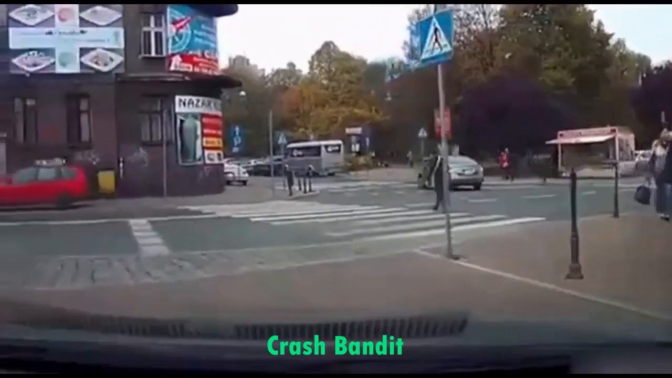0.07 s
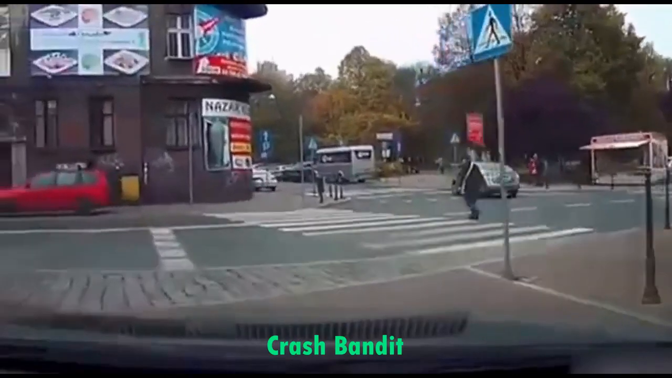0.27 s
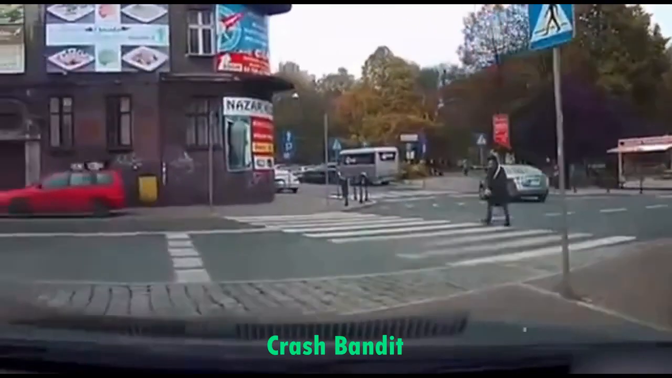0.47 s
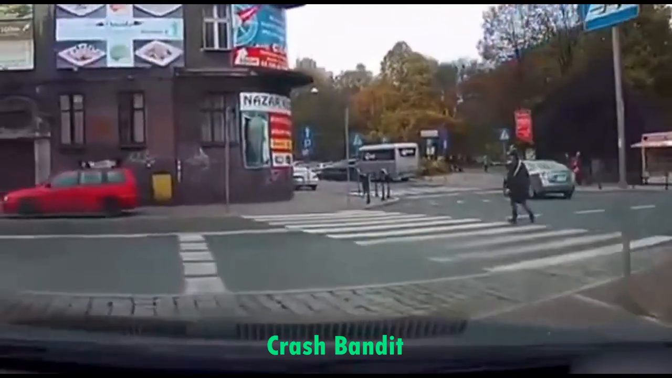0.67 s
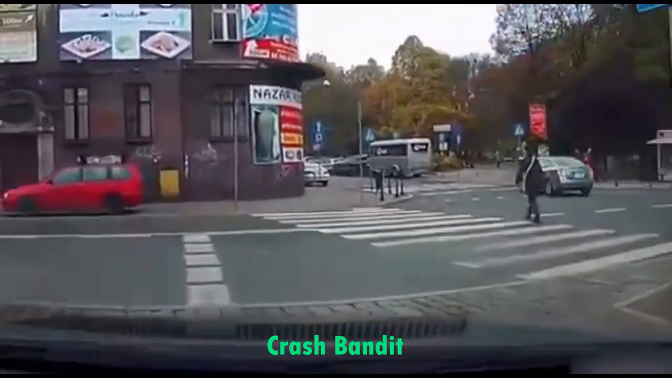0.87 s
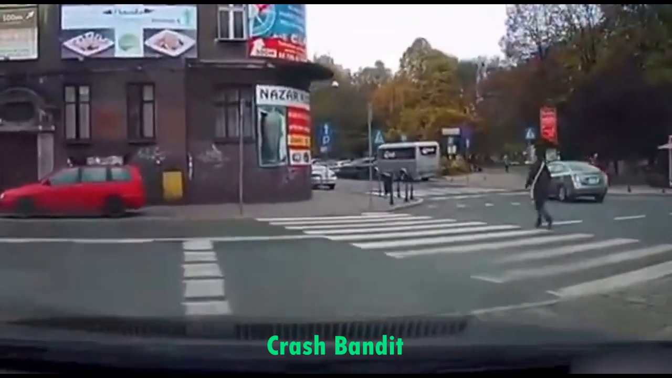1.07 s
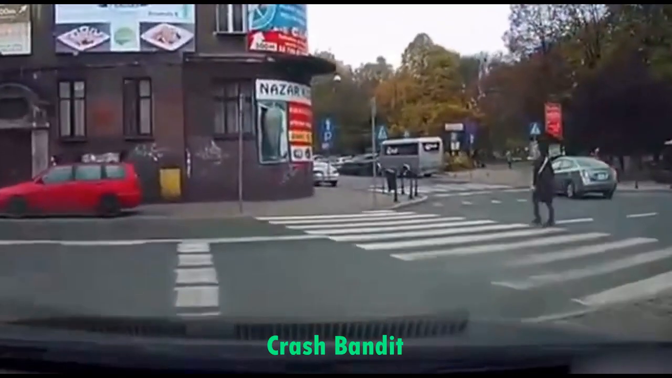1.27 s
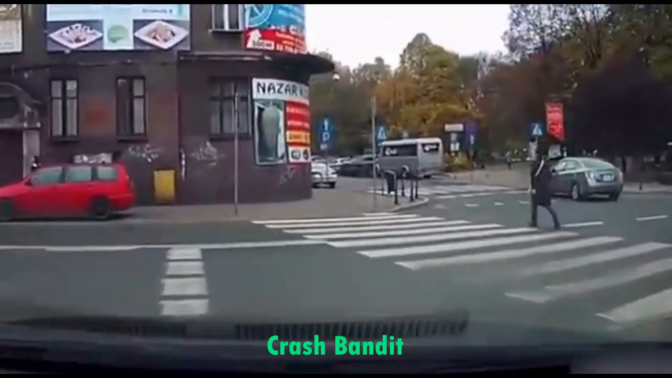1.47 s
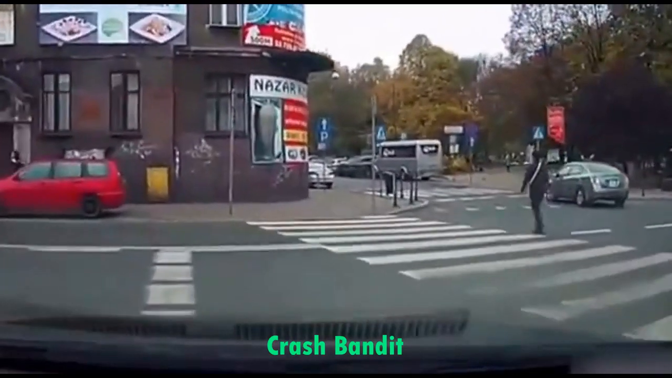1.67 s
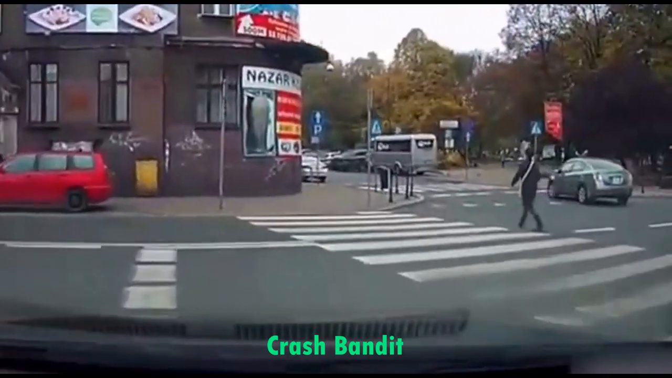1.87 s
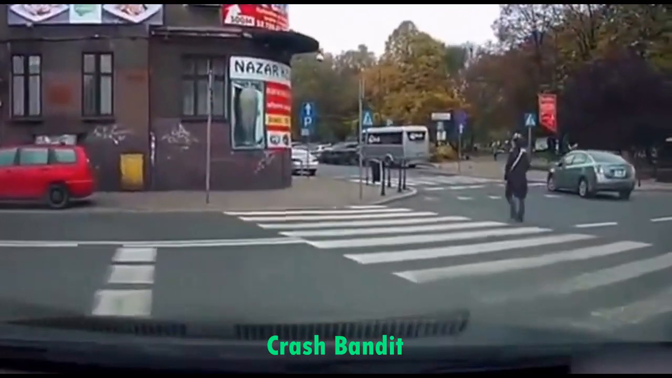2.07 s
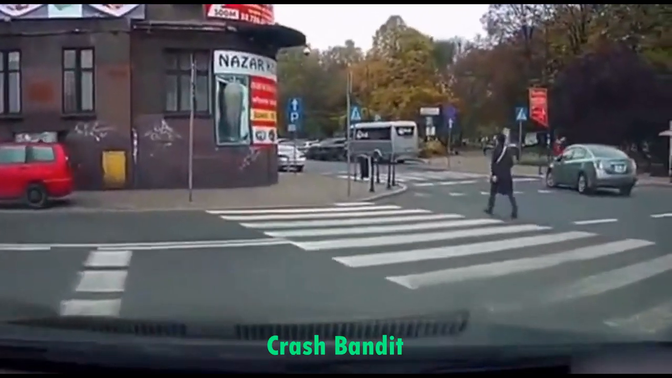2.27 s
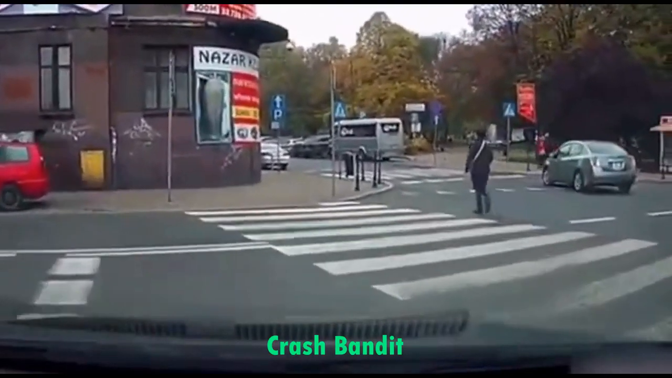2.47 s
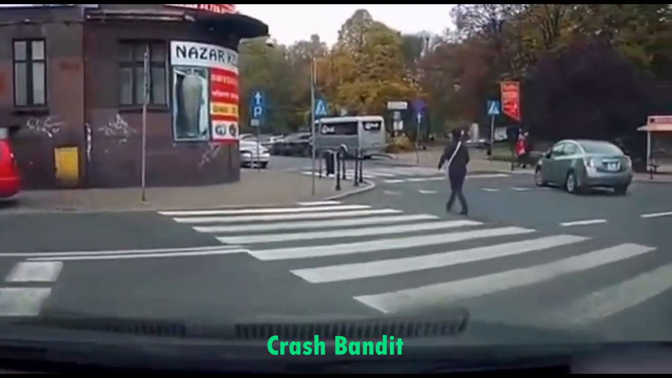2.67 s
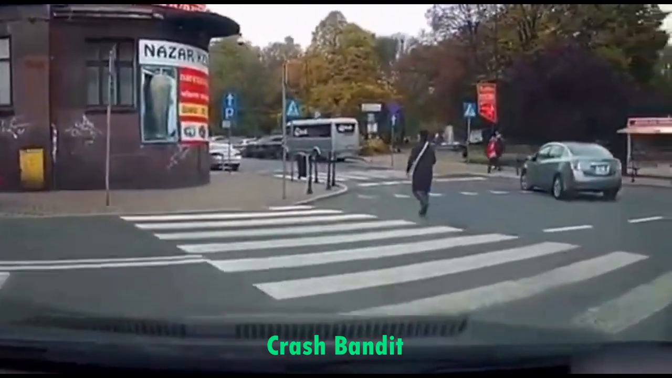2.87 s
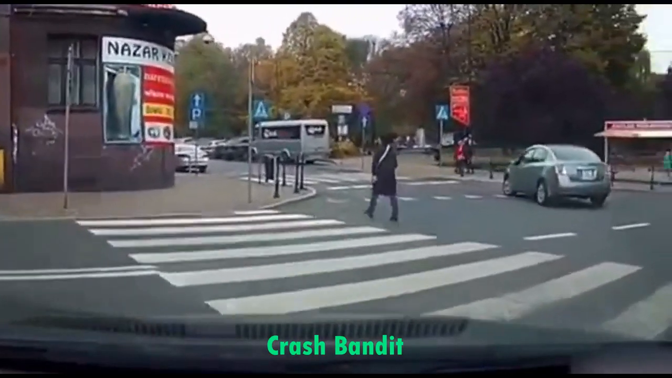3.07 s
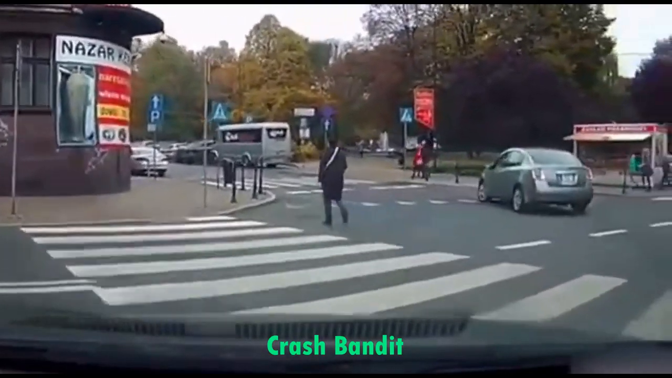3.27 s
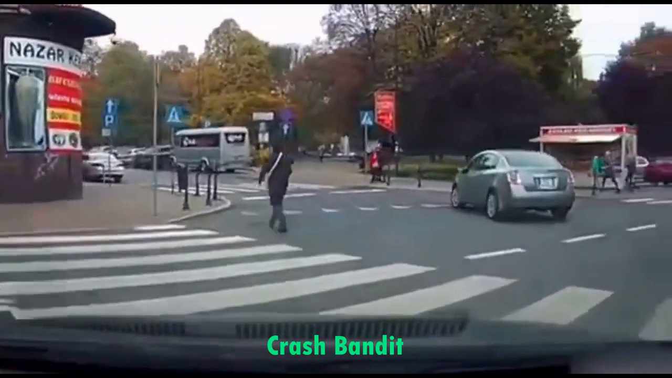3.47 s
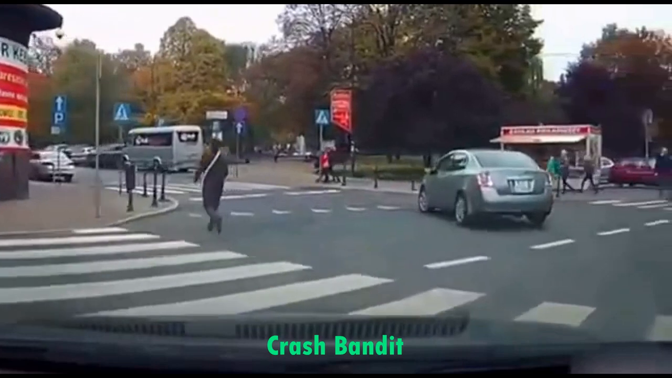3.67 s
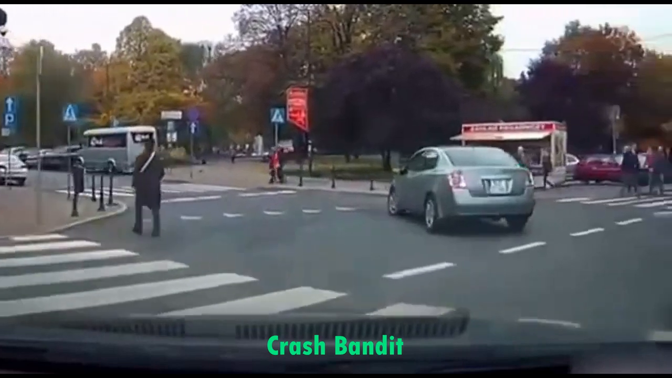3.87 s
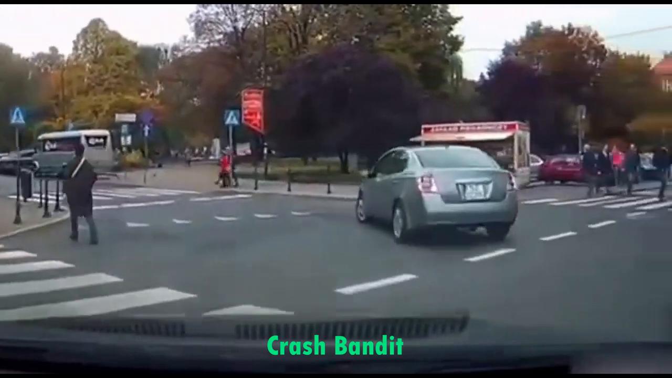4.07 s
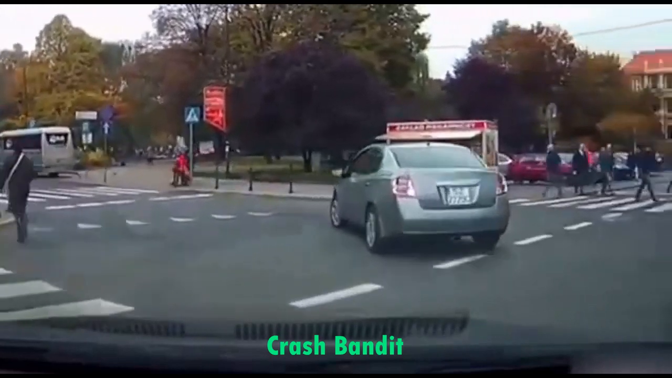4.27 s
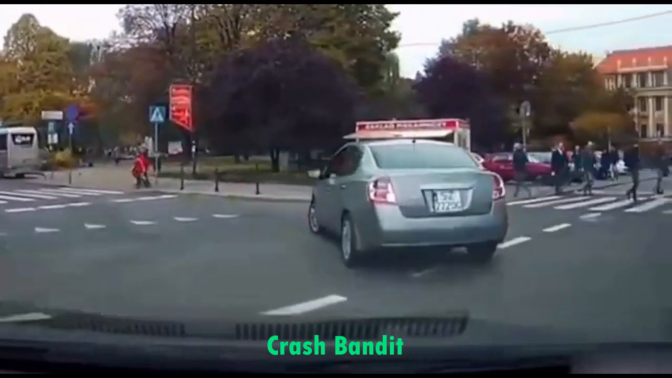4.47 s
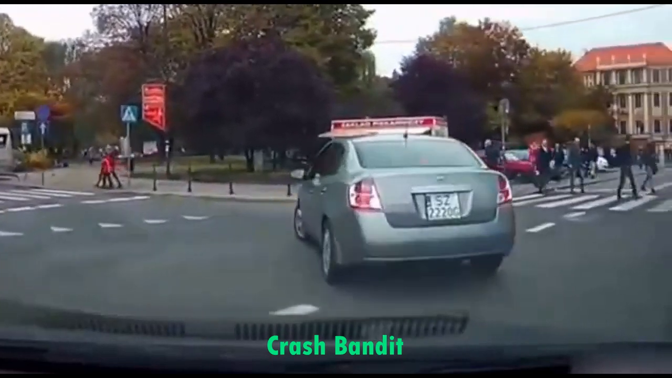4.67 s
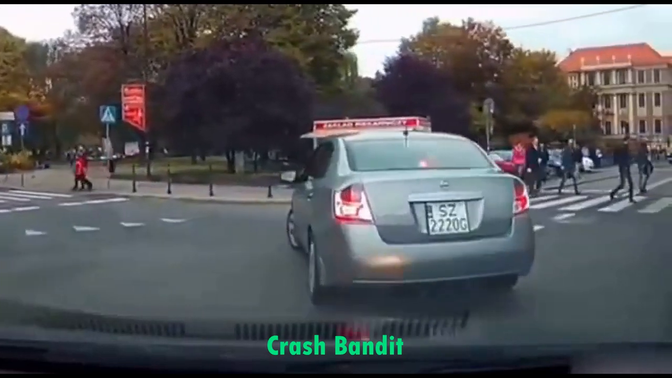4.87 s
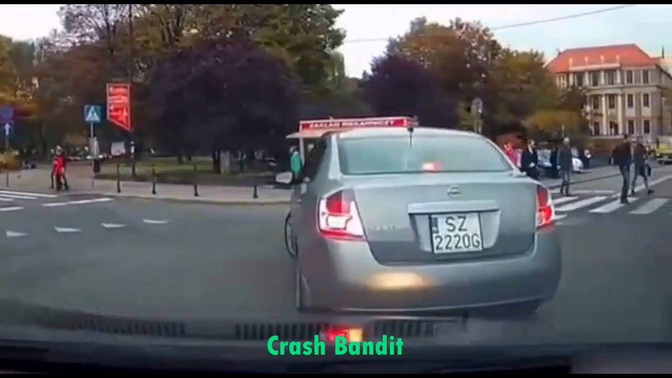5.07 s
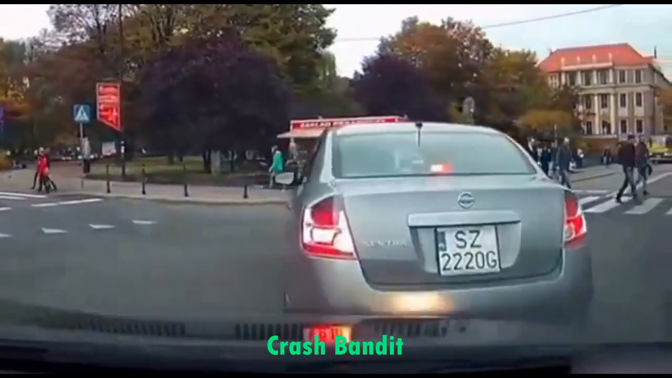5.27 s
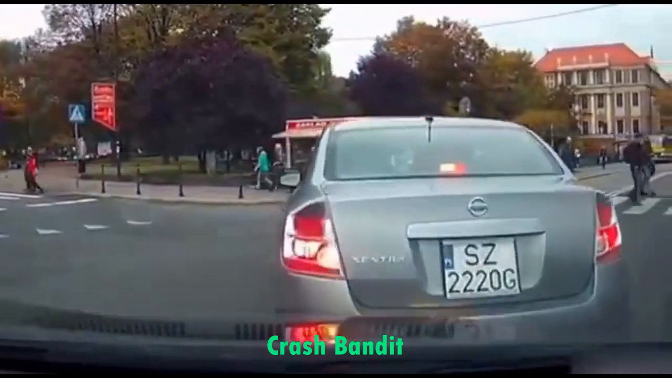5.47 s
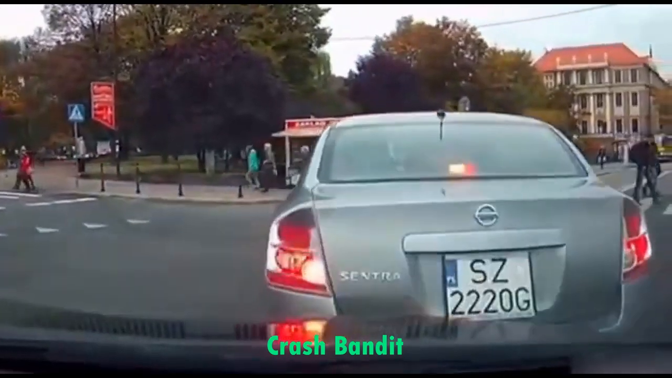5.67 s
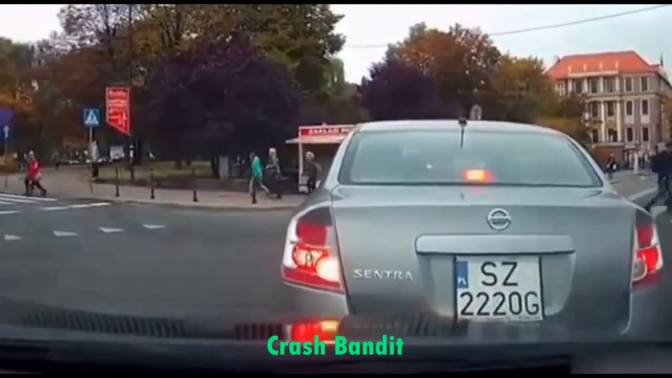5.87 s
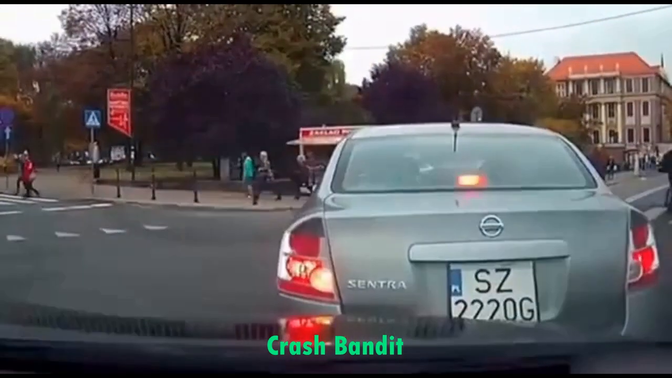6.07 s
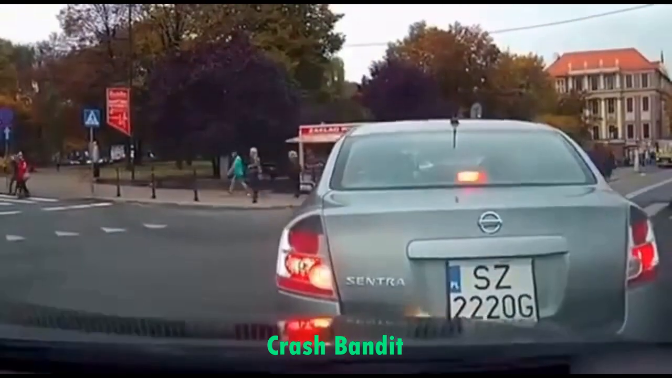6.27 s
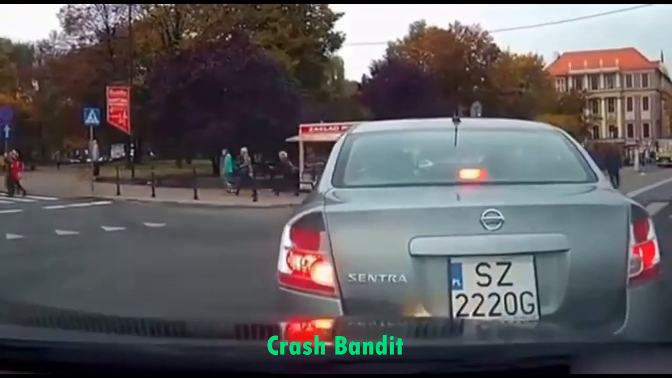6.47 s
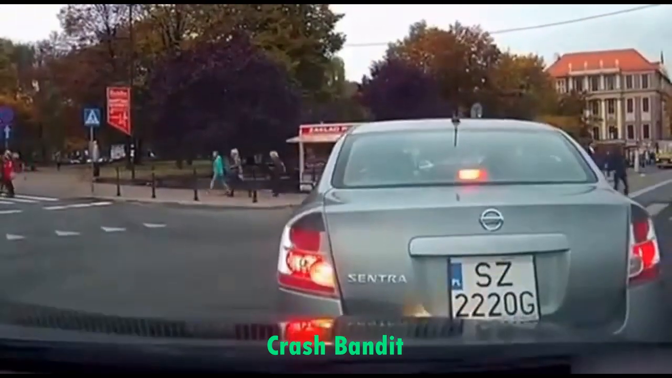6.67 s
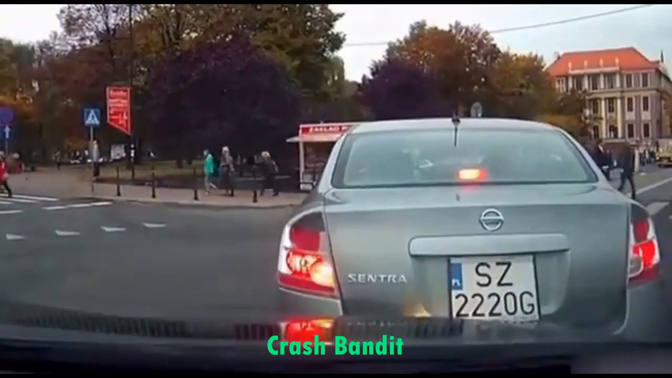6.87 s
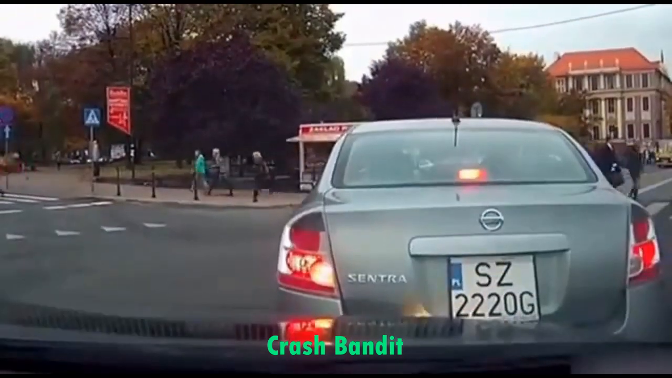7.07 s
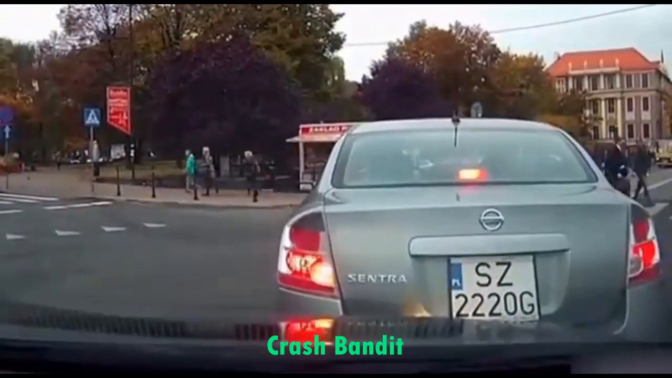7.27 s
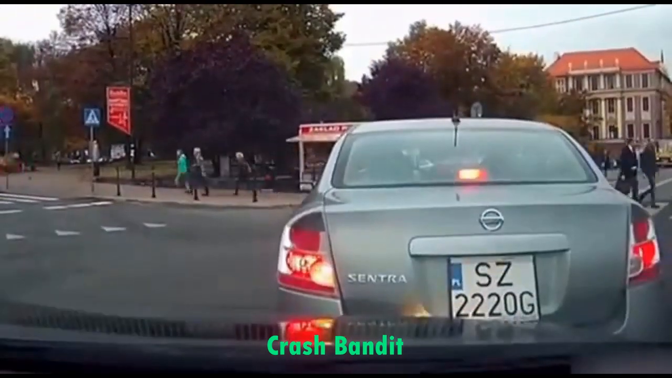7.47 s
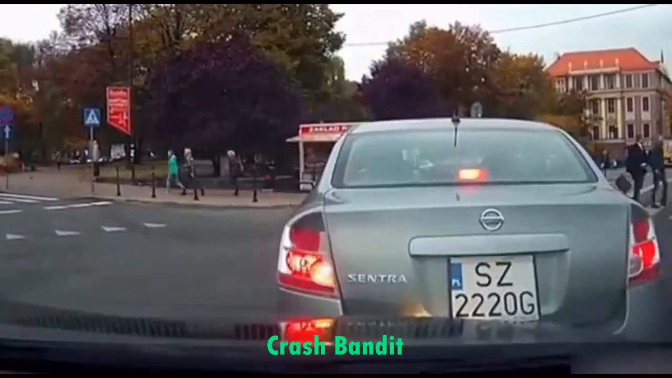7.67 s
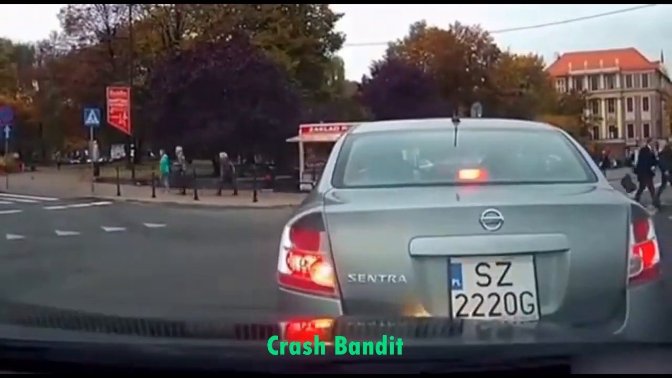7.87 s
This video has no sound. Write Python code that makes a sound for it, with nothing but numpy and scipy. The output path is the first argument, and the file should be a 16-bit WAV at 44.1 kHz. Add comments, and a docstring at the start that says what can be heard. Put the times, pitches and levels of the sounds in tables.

```python
"""Inside a car that creeps across a city junction and runs into the back of the car ahead.
First the four-cylinder engine booms at low revs over tyre rumble, and the tyres grumble in the turn; then it idles.
Near 5.7 s the bumpers meet with one bang of noise thuds and ringing panels; plastic crunches and cracks.
Small shards tinkle, the engine idles on a little slower, and near 7.7 s the body settles with a last soft thump.
The engine is made of tones and noise in step with its firings, the tyres of filtered noise."""
import sys
import numpy as np
from scipy import signal
from scipy.fft import rfft, irfft
from scipy.io import wavfile

SR = 44100
rng = np.random.default_rng(int(sys.argv[2]) if len(sys.argv) > 2 else 0)


def put_to_file(sound):
    """Save the sound as 16-bit audio at rate SR, in the file named by the first command-line argument."""
    columns = np.atleast_2d(sound).T  # one column per channel
    safe = np.clip(columns, -1, 1)
    whole_steps = np.round(safe * 32767)
    wavfile.write(sys.argv[1], SR, whole_steps.astype(np.int16))


N = 349391

# How fast the engine fires: (time [s], firing rate [firings per s])
ENGINE_SPEED = [(0, 54.5), (.25, 52), (.6, 45), (1, 42), (1.5, 33.6), (2.1, 31), (2.75, 36), (3, 33.4),
                (3.4, 41.5), (3.7, 41), (4.06, 32.9), (4.55, 30.3), (5.6, 30.4), (6.05, 26.55)]


def engine_speed():
    """The firing rate sets the pitch; its running sum counts the firings so far."""
    firing_hz, = in_time(ENGINE_SPEED)
    return firing_hz, np.cumsum(firing_hz) / SR


# Higher tones of the engine: (multiple of the firing rate [-], level [dB])
HIGHER_ORDERS = [(3, -49.5), (4, -48.5), (5, -55.5), (6, -59.5), (8, -59.5)]
IDLE_HZ = 26.55
BOOM_IDLE_DB, BOOM_DB_PER_HZ = -36, .66   # the firing tone grows with the revs
# at idle the octave of the firing tone sits on a cabin resonance
OCTAVE_IDLE_DB, OCTAVE_DRIVING_DB, OCTAVE_WIDTH_HZ = -32, -40, 4


def engine_boom(firing_hz, turns, waver_db, shake_rad):
    """The low firing orders add up to one pressure pulse per firing, which shakes the whole cabin."""
    above_idle = firing_hz - IDLE_HZ
    firing_gain = from_db(BOOM_IDLE_DB + BOOM_DB_PER_HZ * above_idle) + lugging()
    firing_db = 20 * np.log10(firing_gain)
    resonance = 1 / (1 + (above_idle / OCTAVE_WIDTH_HZ) ** 2)
    octave_db = OCTAVE_DRIVING_DB + (OCTAVE_IDLE_DB - OCTAVE_DRIVING_DB) * resonance
    boom = 0
    for order, db in [(1, firing_db), (2, octave_db)] + HIGHER_ORDERS:
        phase = order * (2 * np.pi * turns + shake_rad * drift(15))
        gain = np.sqrt(2) * from_db(db + waver_db * drift(10))
        boom = boom + gain * np.cos(phase)
    return boom


# The engine labours at low revs and the boom swells: (time [s], hold [s], level [dB])
LABOURING = [(.54, .02, -17), (1.15, .27, -22), (1.5, .12, -28), (2.02, .04, -28), (2.68, .27, -23),
             (3.08, .1, -21), (3.34, .01, -18), (3.67, .18, -20), (4.35, .08, -32), (5.8, .17, -24.5)]


def lugging():
    """Each spell of labouring sets in quickly, holds and dies away."""
    spells = [gesture(s, db, .05, hold, fall_db_per_s=130) for s, hold, db in LABOURING]
    return np.max(spells, axis=0)


# Accelerator, eased off and later pressed once more: (time [s], extra clatter [dB])
ACCELERATOR = [(0, 6.8), (.85, 0), (2.55, .5), (3.2, 8.2), (3.48, 9.5), (3.7, 0)]
# Tone colour of the engine bay: (frequency [Hz], relative level [dB per Hz])
ENGINE_BAY_COLOUR = [(100, -16.5), (200, -1), (270, -1), (360, 1.5), (460, -3), (610, -2.5), (740, -3),
                     (795, 0.5), (880, -11), (1100, -14.5), (1400, -18.5), (1650, -28.5), (2200, -37.5),
                     (2800, -26.5), (3300, -49), (8000, -58)]
CLATTER_DB, THROB_DEPTH = -50.3, .38   # level with the pedal up; depth from 0 to 1


def engine_clatter(turns, repeat, uneven_db, jitter_db, count=120):
    """Every firing sends a puff of knocks through the bulkhead, partly the same each time."""
    pedal_db, = in_time(ACCELERATOR)
    # one firing's knocks: equally strong harmonics with random phases
    harmonics = np.exp(2j * np.pi * rng.random(count))
    knocks = irfft(np.r_[0, harmonics], 32 * count)
    same = rms_one(np.interp(turns % 1, np.linspace(0, 1, len(knocks)), knocks))
    throb = (1 + THROB_DEPTH * np.cos(2 * np.pi * turns)) / np.sqrt(1 + THROB_DEPTH ** 2 / 2)
    # strong and weak firings take turns, with some chance
    strength = from_db(uneven_db * np.cos(np.pi * turns) + jitter_db * drift(60))
    puffs = throb * strength
    steady = rms_one(colour(same * puffs, ENGINE_BAY_COLOUR))
    loose = rms_one(colour(rng.standard_normal(N) * puffs, ENGINE_BAY_COLOUR))
    mix = np.sqrt(repeat) * steady + np.sqrt(1 - repeat) * loose
    return from_db(CLATTER_DB + pedal_db) * mix


# Blows on the body (road joints, the collision, settling):
# (time [s], level [dB], cabin boom relative to that level [dB])
BODY_BLOWS = [(.595, -33, -2), (1.155, -38, -6), (1.512, -39, -6), (2.811, -35, -8), (2.96, -35, -8),
              (3.787, -37, -6), (4.025, -35.5, -8), (4.475, -34, -10), (5.682, -18, 3), (5.688, -14.5, -11),
              (5.712, -20, -5), (5.752, -25.5, -6), (5.809, -21, 0), (5.85, -25, -3), (6.005, -27.5, -7),
              (6.115, -34, -6), (6.166, -37, -6), (6.234, -34.5, 0), (6.262, -34, 12), (7.696, -32.5, 9)]
# Ringing body panels: (frequency [Hz], relative level [dB], time to die away by 60 dB [s])
BODY_PANELS = [(109, -10, .25), (140, -12, .25), (248, -5, .23), (335, -9, .2), (422, -5, .2),
               (795, -14, .25), (850, -14, .25), (1080, -17, .35), (2369, -22, .06), (494, -3, .19),
               (542, 5, .18), (592, 3, .08)]
# Tone colour of the body shell: (frequency [Hz], relative level [dB per Hz])
SHELL_COLOUR = [(40, 0.5), (75, 5.5), (130, -2), (250, 2), (400, -2), (600, -16), (800, -8), (1100, -21),
                (1500, -30), (2000, -32), (2700, -29), (3600, -49.5), (6000, -56.5), (14000, -65.5)]
BLOW_T60_S, BLOW_T60_S_PER_DB = .125, .0015   # for the hardest blow; lighter ones die sooner


def blows(rise_s, ring_db, thud_db, cabin_hz, cabin_t60_s, swell_s):
    """Each blow is a dense thud of the shell, a slower boom of the cabin air and a ring of the panels."""
    s, db, boom_db = np.transpose(BODY_BLOWS)
    t60 = np.maximum(BLOW_T60_S - BLOW_T60_S_PER_DB * (db.max() - db), rise_s)
    thud = colour(rng.standard_normal(N) * bursts(zip(s, db, t60), rise_s), SHELL_COLOUR)
    boom_rows = [(start, level_db, cabin_t60_s) for start, level_db in zip(s, db + boom_db)]
    boom = bursts(boom_rows, swell_s, cabin_hz)
    # each blow pushes each panel in or out at random
    signs = rng.choice([-1, 1], (len(BODY_BLOWS), len(BODY_PANELS)))
    strengths = signs * from_db(db)[:, None]
    rings = 0
    for (hz, panel_db, panel_t60), strength in zip(BODY_PANELS, strengths.T):
        clicks = np.zeros(N)
        clicks[(s * SR).astype(int)] = strength
        rings = rings + from_db(panel_db) * ring(clicks, hz, panel_t60)
    return from_db(thud_db) * thud - boom + from_db(ring_db) * rings


# Tone colour of the bumper: (frequency [Hz], relative level [dB per Hz])
BUMPER_COLOUR = [(53, -47.5), (90, -7), (132, 6), (190, -4.5), (268, -2.5), (509, -17.5), (870, -14.5),
                 (1450, -30.5), (2760, -37), (3210, -38), (4240, -49), (4620, -44), (6640, -51),
                 (15000, -76)]


def crunch(per_s, spread_db, rub, cycles, groan_hz, groan_t60_s, groan_db, count=40):
    """The bumper buckles in a quick run of snaps, each ringing at a pitch of its own, while the two cars rub."""
    at = np.flatnonzero(rng.random(N) < per_s / SR)
    size_db = spread_db * np.minimum(rng.exponential(1, len(at)), 2)
    sizes = rng.choice([-1, 1], len(at)) * from_db(size_db)
    pitch_number = rng.integers(0, count, len(at))
    snaps = 0
    for k, hz in enumerate(np.geomspace(300, 9000, count)):
        clicks = np.zeros(N)
        clicks[at] = sizes * (pitch_number == k)
        snaps = snaps + hz * ring(clicks, hz, cycles / hz)   # small pieces snap harder and die sooner
    rubbing = rub * rng.standard_normal(N) * from_db(spread_db * drift(90) / 2)
    crushing = rms_one(colour(rms_one(snaps) + rubbing, BUMPER_COLOUR))
    # the skin of the bumper sings as it slips
    groan = from_db(groan_db) * rms_one(ring(rubbing, groan_hz, groan_t60_s))
    return pressing() * (crushing + groan)


# The bumpers press on each other (impact, long crush, later slips): (time [s], hold [s], level [dB])
BUMPER_CONTACTS = [(5.68, .025, -28.5), (5.69, .1, -33.5), (5.8, .235, -31), (6.229, .008, -37.5),
                   (6.27, .018, -40), (7.685, .02, -49)]
# the plastic creaks on as it relaxes; level relative to the contact
CREAK_DB, CREAK_FALL_DB_PER_S = -11.5, 55


def pressing():
    """Force between the bumpers: each contact lets go quickly and leaves a fading creak."""
    contacts = [gesture(s, db, .01, hold, fall_db_per_s=290) for s, hold, db in BUMPER_CONTACTS]
    force = np.max(contacts, axis=0)
    fade = from_db(-CREAK_FALL_DB_PER_S * np.arange(N) / SR)
    # the strongest contact so far, faded since it happened
    fading_force = np.maximum.accumulate(force / fade) * fade
    return np.maximum(force, from_db(CREAK_DB) * fading_force)


# Plastic cracking and creaking: (time [s], level [dB], time to die away by 60 dB [s])
PLASTIC_CRACKS = [(.781, -61, 0.054), (5.689, -35.5, 0.021), (5.872, -49, .05), (5.894, -40, 0.053),
                  (5.908, -40.5, 0.08), (5.945, -56, .1), (6.232, -70, .05), (7.696, -67.5, 0.089)]
# Tone colour of splintering plastic: (frequency [Hz], relative level [dB per Hz])
SPLINTER_COLOUR = [(1500, -20), (3600, -6), (4150, 7.5), (5300, -7.5), (6650, -4.5), (7500, -21),
                   (14000, -28)]
# Small shards tinkling: (time [s], level [dB], frequency [Hz])
TINKLING_SHARDS = [(5.833, -56, 9500), (6.025, -59, 11700), (6.027, -58, 9300), (6.058, -62, 11800),
                   (6.351, -59, 9400), (6.4, -61, 9500)]


def cracks(rise_s, shard_t60_s):
    """Brittle plastic splits with bright cracks; tiny pieces tinkle."""
    splits = colour(rng.standard_normal(N) * bursts(PLASTIC_CRACKS, rise_s), SPLINTER_COLOUR)
    tinkle = sum(bursts([(s, db, shard_t60_s)], rise_s, hz) for s, db, hz in TINKLING_SHARDS)
    return splits + tinkle * np.cos(.8 * drift(400))   # the tinkle flickers


# Road rumble as the car rolls to a halt: (time [s], level [dB])
ROAD_RUMBLE = [(0, -21), (.65, -22), (1.0, -28), (2.2, -26.5), (3.5, -25.5), (4.45, -28.5), (4.8, -36),
               (6.75, -43)]
# The car rocks on its springs at the collision and again as it settles: (time [s], level [dB])
SPRING_ROCKS = [(5.68, -23.5), (7.5, -36.5)]
# Tone colour of the road: (frequency [Hz], relative level [dB per Hz])
ROAD_COLOUR = [(18, -22.5), (28, -5), (40, 5.5), (55, -0.5), (72, -7.5), (100, -9.5), (135, -14),
               (175, -27.5), (320, -29.5), (600, -38.5), (1100, -45), (2000, -62), (5000, -76.5),
               (12000, -87)]


def road(lumpy_db, rocking_hz, darkening):
    """Tyres on uneven asphalt; as the car slows, mostly the deep rocking of the body is left."""
    rolling_db, = in_time(ROAD_RUMBLE)
    rocking = sum(gesture(s, db, .2, 0, fall_db_per_s=23) for s, db in SPRING_ROCKS)
    level_db = 20 * np.log10(np.hypot(from_db(rolling_db), rocking))
    rumble = colour(rng.standard_normal(N) * from_db(lumpy_db * drift(30)), ROAD_COLOUR)
    low_pass = signal.butter(2, rocking_hz, fs=SR, output="sos")
    deep = signal.sosfiltfilt(low_pass, rumble)
    # the higher part loses extra level as the road grows quieter
    dimming = from_db(darkening * (level_db - level_db.max()))
    return from_db(level_db) * (deep + (rumble - deep) * dimming)


def scrub(hz, t60_s, lumpy_db):
    """Steered tyres grumble in a pair of resonances of the front suspension."""
    grip = rng.standard_normal(N) * from_db(lumpy_db * drift(25))
    grumble = rms_one(ring(grip, hz, t60_s) - ring(grip, hz * 0.78, t60_s))
    # the tyres bite in the turn, then ease
    return gesture(2.6, -43, .22, 0, fall_db_per_s=14) * grumble


def from_db(db):
    """Decibels to gain."""
    return np.exp(np.asarray(db) * (np.log(10) / 20))


def rms_one(x):
    """Scale to unit rms (average strength)."""
    return x / np.sqrt(np.mean(x ** 2) + 1e-20)


def in_time(rows):
    """Each column of a curve at every sample."""
    s, *columns = np.transpose(rows)
    return [np.interp(np.arange(N) / SR, s, c) for c in columns]


def colour(x, points):
    """Causal (minimum-phase) filter with the given spectrum and unit power gain."""
    hz, db = np.transpose(points)
    size = 2 ** 14
    log_f = np.log(np.fft.rfftfreq(size, 1 / SR) + 1)
    below = np.minimum(log_f - np.log(hz[0]), 0)   # the bass rolls off under the first point
    gain = rms_one(from_db(np.interp(log_f, np.log(hz), db) + 20 * below))
    # folding the cepstrum gives the phase that starts the sound at once
    cepstrum = irfft(np.log(gain))
    cepstrum[1:size // 2] *= 2
    cepstrum[size // 2 + 1:] = 0
    return signal.oaconvolve(x, irfft(np.exp(rfft(cepstrum))))[:N]


def drift(rate):
    """Slow chance: random points, rate of them per second, joined by straight lines."""
    knots = rng.standard_normal(4096)
    return np.interp(np.arange(N) / SR * rate, np.arange(len(knots)), knots)


def ring(x, hz, t60):
    """A unit click sets a sine of height 1 ringing; it dies away by 60 dB in t60 seconds."""
    r, w = from_db(-60 / (t60 * SR)), 2 * np.pi * hz / SR
    return signal.lfilter([0, np.sin(w)], [1, -2 * r * np.cos(w), r * r], x + 1e-18)


def gesture(s, db, rise, hold, fall_db_per_s):
    """Envelope that rises from time s, holds and then fades at a steady rate."""
    age = np.arange(N) / SR - s
    fade_s = np.maximum(age - rise - hold, 0)
    return np.clip(age / rise, 0, 1) * from_db(db - fall_db_per_s * fade_s)


def bursts(rows, rise, hz=None):
    """Envelopes (time [s], level [dB], t60 [s]) that swell and die away; with hz, each carries a tone."""
    out, age = np.zeros(N + SR), np.arange(SR // 2) / SR
    tone = 1 if hz is None else np.sin(2 * np.pi * hz * age)
    for s, db, t60 in rows:
        start = int(s * SR)
        swell = 1 - np.exp(-age / rise)
        out[start:start + len(age)] += tone * from_db(db - 60 * age / t60) * swell
    return out[:N]


def scene():
    """Everything as it arrives at the windscreen."""
    firing_hz, turns = engine_speed()
    engine = engine_boom(firing_hz, turns, waver_db=1.2, shake_rad=.09)
    engine = engine + engine_clatter(turns, repeat=0.52, uneven_db=-0.1, jitter_db=2.0)
    body = blows(rise_s=.0016, ring_db=-14.5, thud_db=1.5, cabin_hz=134, cabin_t60_s=.2, swell_s=.005)
    plastic = crunch(per_s=1500, spread_db=4.5, rub=.9, cycles=37,
                     groan_hz=1046, groan_t60_s=0.023, groan_db=-13.5)
    plastic = plastic + cracks(rise_s=0.0013, shard_t60_s=0.055)
    tyres = road(lumpy_db=2.5, rocking_hz=68, darkening=0.18)
    tyres = tyres + scrub(hz=338, t60_s=0.037, lumpy_db=1.0)
    return (engine + body + plastic + tyres)[None]


# Tone colour of the microphone hiss: (frequency [Hz], relative level [dB per Hz])
HISS_COLOUR = [(100, -2.5), (1000, 12.5), (3000, 5), (5000, 2.5), (8000, 0.5), (15000, -2.5)]
HISS_DB, WHINE_HZ, WHINE_DB, CUTOFF_HZ = -69.0, 7882, -88, 15100


def record(dry):
    """A small microphone: rounded peaks, faint hiss and whine, the top cut."""
    top = .47   # peaks are rounded off towards this height
    rounded = dry / (1 + (dry / top) ** 6) ** (1 / 6)
    hiss = from_db(HISS_DB) * colour(rng.standard_normal(N), HISS_COLOUR)
    whine = from_db(WHINE_DB) * np.sqrt(2) * np.sin(2 * np.pi * WHINE_HZ * np.arange(N) / SR)
    top_cut = signal.ellip(10, .1, 80, CUTOFF_HZ, fs=SR, output="sos")
    return signal.sosfilt(top_cut, rounded + hiss + whine)


dry = scene()
out = record(dry)
put_to_file(out)
```